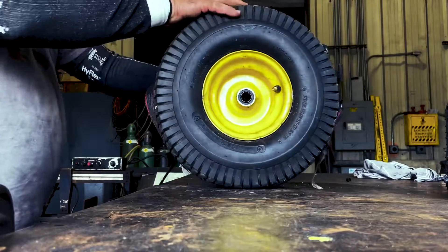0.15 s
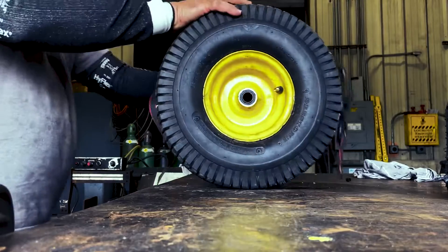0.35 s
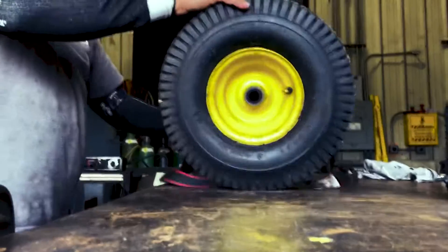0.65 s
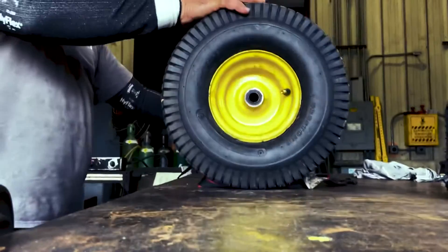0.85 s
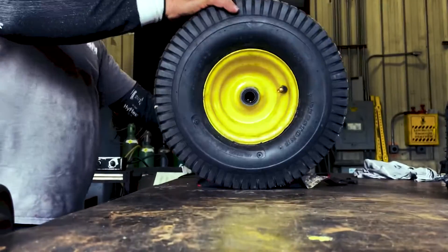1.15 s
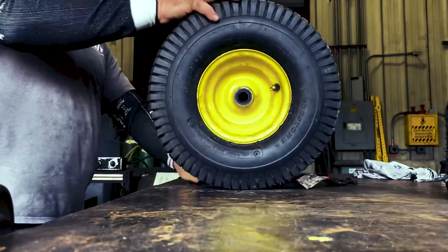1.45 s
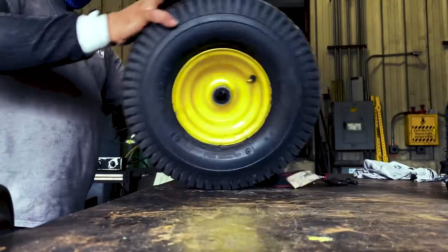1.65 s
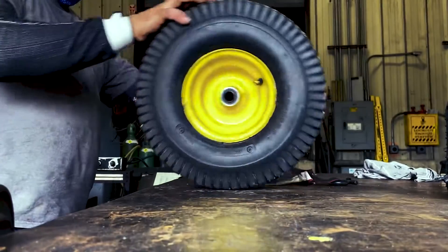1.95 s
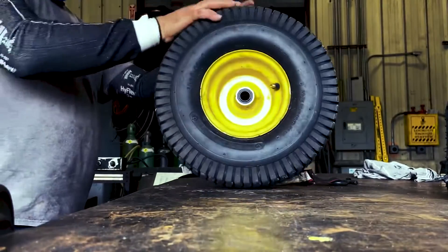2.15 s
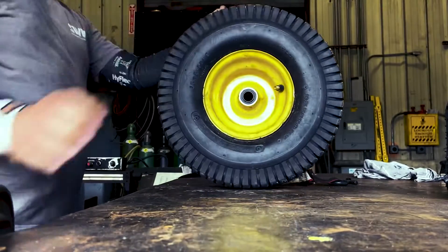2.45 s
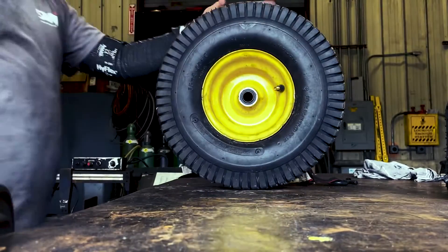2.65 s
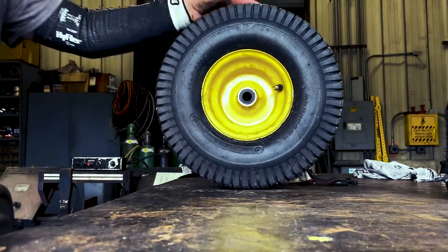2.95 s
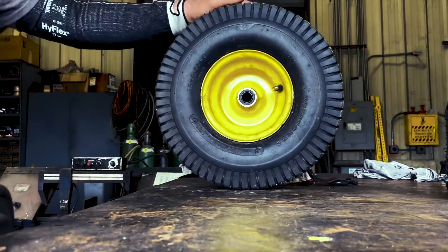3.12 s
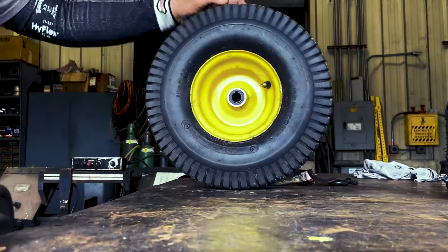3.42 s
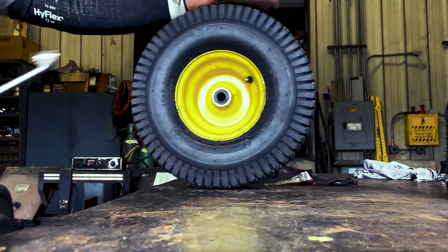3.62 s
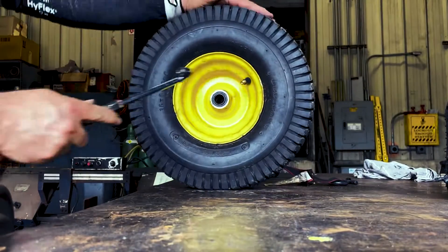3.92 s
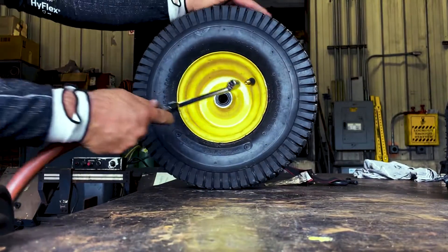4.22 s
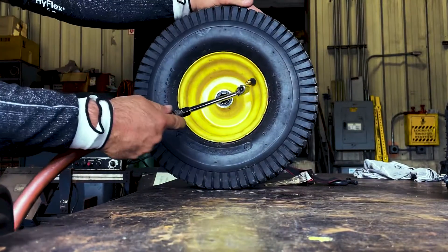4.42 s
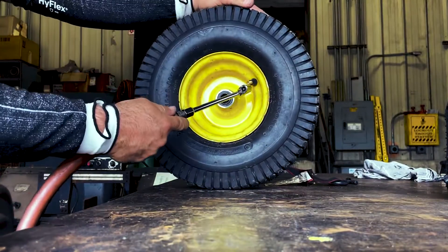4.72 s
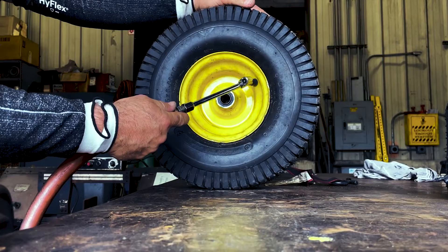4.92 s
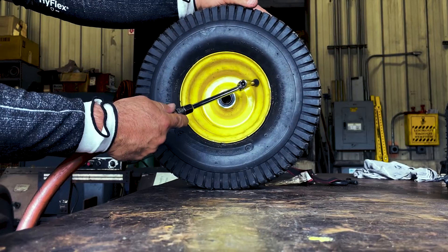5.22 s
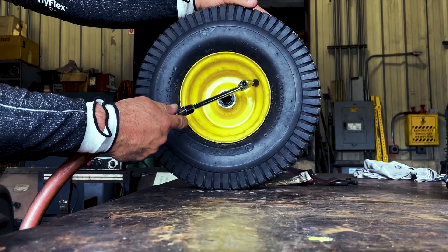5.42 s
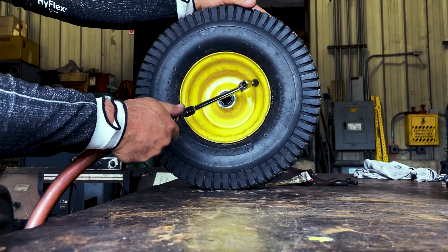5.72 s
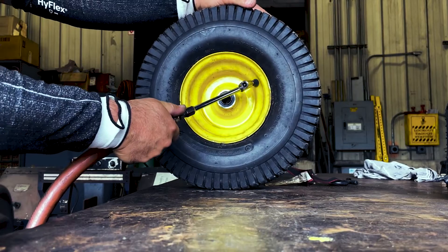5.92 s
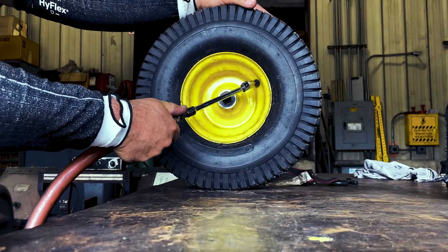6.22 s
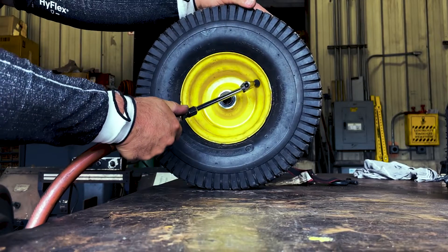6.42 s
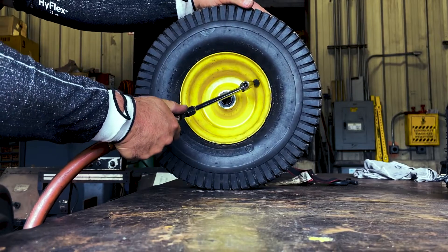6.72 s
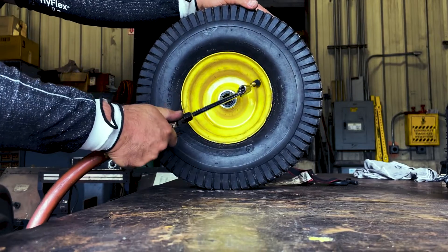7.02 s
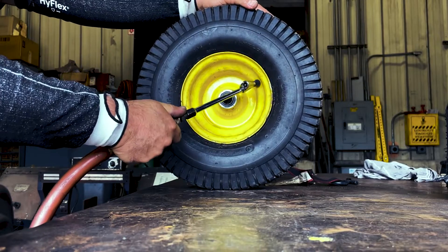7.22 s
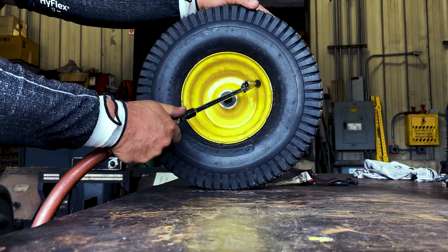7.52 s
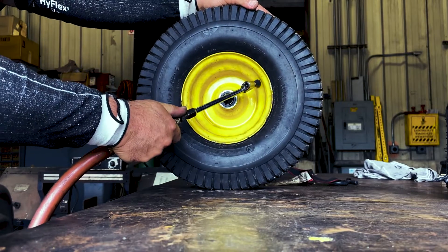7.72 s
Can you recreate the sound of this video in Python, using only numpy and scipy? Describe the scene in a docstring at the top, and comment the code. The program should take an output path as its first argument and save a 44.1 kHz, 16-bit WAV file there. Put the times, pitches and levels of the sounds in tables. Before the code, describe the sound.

A wide, breathy air leak fills the first seconds of a stereo close workshop recording, interrupted early by a strap buckle rattling and ringing on a booming metal bench. A low hum swells faintly. The hose drags, then loud pressure thumps and sharp crackling snaps hit the microphone as the chuck moves in. Afterwards a quieter, bright hiss flutters at the tire valve, weakening before a last small pop.

```python
"""In a workshop an air chuck leaks at some distance, a filtered hiss louder on the left in its low middle.
A strap buckle drops on the steel bench: decaying tones, bench booms and noise bursts, with the walls after.
At 3 s the hose scrapes, the chuck is lifted and its jet crosses the microphone: pressure pops, noise gusts.
From 4.1 s it is pressed on a small tire's valve close by, a fluttering hiss with a short breathy whistle.
A wavering sine hum comes and goes behind; a low noise rumble falls away after 4.1 s to a faint murmur."""
import sys
import numpy as np
from scipy import signal
from scipy.fft import rfft, irfft, next_fast_len
from scipy.io import wavfile
from scipy.ndimage import uniform_filter1d, map_coordinates

SR = 44100
rng = np.random.default_rng(int(sys.argv[2]) if len(sys.argv) > 2 else 0)


def store_wav(level_fs):
    """Save 16-bit WAV to argv[1]."""
    pcm = np.round(np.clip(np.atleast_2d(level_fs), -1, 1) * 32767)
    wavfile.write(sys.argv[1], SR, pcm.T.astype(np.int16))


N = 346626

# Leak across the shop, then swung closer: time_s, fizz_db, rumble_db
FAR_LEAK = [(0, -39, -49), (.45, -37.5, -45.5), (1.05, -38, -44), (1.5, -37.5, -48), (2.7, -36.5, -47.5),
            (3.09, -38, -46), (3.16, -32, -44), (3.24, -35, -42), (3.34, -36, -42), (3.48, -30, -36.5),
            (3.55, -33, -33.5), (3.64, -32.5, -51), (3.86, -33.5, -52), (4.01, -31.5, -37),
            (4.09, -31.5, -53), (4.14, -39, -62)]
# Its spectrum: pitch_hz, density_db (per Hz)
FAR_COLOUR = [(60, -5), (130, 0.0), (300, -7.8), (700, -6.2), (1600, -7.3), (2200, -11.3), (3000, -11.5),
              (4400, -5.2), (5300, -8.4), (7800, -7.0), (9600, -0.6), (11700, -4.0), (13500, -6.7),
              (15600, -3.2)]
# Its likeness between left and right: pitch_hz, correlation (1 is identical)
FAR_ALIKE = [(60, 0.98), (300, 0.93), (700, 0.14), (1400, 0.014), (2200, 0.077), (3100, 0.85), (4200, 1),
             (5200, 0.5), (6200, 0.29), (7300, 0.47)]
# Its lean: pitch_hz, left_minus_right_db
FAR_BALANCE = [(200, -1), (700, 2), (1300, 5), (2400, 2.5), (4400, 1), (7000, 0)]
# Breathy resonances and dips of the chuck: pitch_hz, spread_hz, gain_db
FAR_PEAKS = [(503, 28, 4.5), (650, 67, 2), (827, 50, -4.5), (1280, 90, 1.5), (1510, 90, -2.5),
             (1770, 25, 2.5), (2150, 120, 0), (2530, 100, 5), (2900, 90, 1), (3304, 94, 6), (3900, 90, -1),
             (4230, 60, 2), (4590, 70, 4.5), (4860, 80, -3.5)]
# Throat, body, fizz and edge registers: rest_db, slope (dB gained for each dB of fizz)
FAR_FOLLOW = [(-47.5, 1.03), (-42, 1), (-36, 1.12), (-37.5, 3)]
FAR_REST_DB = -37  # fizz while the chuck lies still
BODY_FROM_RUMBLE, RUMBLE_REST_DB = 0.27, -42.5  # body dB for each dB of rumble over its rest
LIFTED_S, LIFTING_S = 3.08, .1  # once the chuck is lifted its resonances blur: start, length

# Leak at the valve as the grip shifts: time_s, hiss_db, throat_db
NEAR_LEAK = [(4.09, -39, -50), (4.18, -36.5, -47.5), (4.35, -40, -44.5), (4.55, -39, -41.5),
             (4.75, -40, -42), (4.92, -39.5, -43), (5.07, -39, -47.5), (5.17, -38, -42), (5.25, -37, -42.5),
             (5.35, -40, -49.5), (5.47, -38, -46.5), (5.53, -43.5, -48), (5.84, -43, -48.5),
             (5.93, -38, -45), (5.96, -42.5, -53), (6.095, -40, -49), (6.115, -39.5, -41),
             (6.17, -39.5, -43), (6.25, -44.5, -49), (6.4, -41, -47.5), (6.7, -40, -49), (6.84, -41, -46.5),
             (6.905, -39, -48.5), (6.93, -45.5, -62), (7.03, -45.5, -61), (7.13, -49, -59),
             (7.26, -45, -62), (7.36, -48, -63.5), (7.65, -45.5, -58), (7.8, -39.5, -45.5),
             (7.86, -38, -45)]
# Its middle register: time_s, level_db
NEAR_MIDDLE = [(4.18, -48), (4.22, -47), (4.33, -50), (5.19, -50.5), (5.2, -49.5), (5.66, -53.5),
               (5.9, -50.5), (6.0, -55.5), (6.15, -45.5), (6.21, -52), (6.61, -48), (6.91, -49.5),
               (6.93, -63.5), (7.64, -59.5), (7.85, -48.5), (7.86, -52)]
# Its spectrum: pitch_hz, density_db (per Hz)
NEAR_COLOUR = [(650, -27), (830, -14), (1300, -9.5), (1600, -8), (2120, -10.5), (2450, -16.5),
               (2800, -15.5), (3300, -15.5), (4400, -13.1), (7000, -14.2), (9300, -12.5), (11500, -7.1),
               (13300, -8.8), (14600, -3.8), (15600, 0.0)]
# Its likeness between left and right: pitch_hz, correlation
NEAR_ALIKE = [(300, 0.93), (640, 0.54), (1400, 0.87), (2100, 0.95), (2800, 0.83), (3700, 1), (4300, 0.99),
              (4800, 0.69), (5400, 0.88), (6400, 0.62), (7300, 0.67)]
# Treble likeness given to both hisses: pitch_hz, correlation
TREBLE_ALIKE = [(7650, 1), (8700, 1), (9100, .8), (10100, .8), (10700, 1), (12200, 1), (12600, .8),
                (13800, .8), (14300, 1)]
# Body, fizz and edge registers: mean_db, slope (dB gained for each dB of hiss)
NEAR_FOLLOW = [(-44, 1.21), (-38, 1.3), (-25, 1.2)]
# Resonances and dips of the valve while air flows in: pitch_hz, spread_hz, gain_db
FILLING_PEAKS = [(1630, 28, 4), (1740, 85, -3.5), (2310, 91, -2.5), (3580, 80, 1.5), (3920, 40, 3.5)]
# The same once the flow drops: pitch_hz, spread_hz, gain_db
EASED_PEAKS = [(1900, 150, -4), (2550, 140, -6), (3030, 79, 5), (3530, 120, 3), (4550, 74, 5),
               (5540, 700, -2), (7000, 250, 3)]
NEAR_MEAN_DB, EASED_S = -39, 6.92  # mean hiss; moment the flow drops
EDGE_FLICKER_DB, FLICKERS_PER_S = 1.6, 12
# Breathy resonance of the valve stem: time_s, level_db
WHISTLE = [(4.3, -56), (4.4, -45), (4.6, -59), (4.8, -55), (5, -51), (5.16, -45), (5.3, -60)]
# Its spectrum: pitch_hz, density_db (per Hz)
WHISTLE_COLOUR = [(1150, -34), (1400, -1), (1570, 2), (1750, -21), (2100, -32), (4000, -90)]

# Strongest eddies of the jet on the microphone: time_s, level_db, width_ms, way (push 1, pull -1)
POPS = [(3.5149, -17, 1.4, 1), (3.5246, -13.1, 3, -1), (3.5363, -17, 1.7, 1), (3.5537, -15, 1.6, -1),
        (3.5672, -9, 1.6, 1), (3.5739, -14, 1.6, -1), (3.5807, -9.5, 1.9, -1), (3.5846, -5.5, 3.1, 1),
        (3.592, -4.5, 1.8, -1), (3.5953, -2, 2.4, 1), (3.5961, -3.5, 1.6, -1), (3.6109, -15.5, 1.5, 1),
        (3.6158, -21.5, 1.4, -1), (3.7424, -33, 0.9, -1), (3.908, -20, 1.4, -1), (3.9545, -14, 1.2, 1),
        (3.9725, -20.5, 0.89, -1), (3.985, -18, 0.45, -1), (3.9898, -7.5, 0.41, 1), (3.9972, -11, 0.35, 1),
        (4.0025, -10, 0.25, 1), (4.0106, -23, 0.34, -1), (4.0283, -13.5, 0.28, -1), (4.0325, -15, 0.12, 1),
        (4.039, -14, 0.19, -1), (4.0515, -16.5, 0.2, 1), (4.0635, -20.5, 0.25, 1),
        (4.0745, -25.5, 0.15, -1), (4.1004, -25, 1, -1), (4.1178, -25, 1.6, 1), (4.1483, -33, 0.92, 1),
        (4.1591, -29, 0.64, -1), (4.1745, -30, 0.74, -1), (4.1966, -25, 0.83, 1), (4.2027, -22.5, 1.05, -1),
        (4.2131, -25.5, 0.85, 1), (4.2214, -23.5, 0.86, 1), (4.2257, -24.5, 1.1, -1),
        (4.2364, -34, 0.77, 1), (4.2546, -25, 0.57, -1), (4.2677, -26, 1.7, -1), (4.292, -21, 0.33, -1),
        (4.3642, -43, 0.85, 1), (4.4425, -33, 0.24, 1), (4.6638, -34.5, 0.33, -1), (4.6943, -30, 0.35, 1),
        (4.7098, -20, 0.21, -1), (4.7201, -32, 0.81, -1), (5.1258, -31.5, 0.58, 1), (5.1792, -32, 0.36, -1),
        (5.1974, -31.5, 0.69, -1), (5.2257, -31, 0.35, -1), (5.2316, -29, 0.33, 1), (5.2454, -27, 0.71, -1),
        (5.2634, -38.5, 1.1, -1), (5.3081, -34.5, 0.3, 1), (5.3732, -39.5, 0.64, 1),
        (5.4685, -41, 0.49, -1), (5.5539, -41, 0.87, 1), (6.0141, -43, 0.78, 1), (6.106, -39.5, 0.21, 1),
        (6.1675, -44.4, 0.51, 1), (7.8154, -34.5, 0.57, -1), (7.8357, -19.5, 0.52, 1),
        (7.8517, -26, 0.5, -1)]
# Small eddies at random: start_s, end_s, level_db, eddies_per_s (nominal), width_ms
FLURRIES = [(3.4, 3.6, -31.5, 118, 1.1), (4.076, 4.3, -46.5, 63, 0.39), (4.331, 5.1, -47.5, 11.6, 1.6),
            (5.2, 5.27, -38.5, 65, 0.45), (5.299, 6.2, -53.5, 6.1, 1.3)]
SIDEWAYS_DB, SCATTER_DB = 1.2, -3.5  # scatter of left against right; size scatter of the small eddies
SNAP_DB, SNAP_LATE_S, SNAP_WIDTH_S = -6, .0015, .00007  # a thin snap after each tip
# Bursts of rushing air: time_s, level_db, rise_s (for 20 dB), t60_s, brightness_db
GUSTS = [(3.135, -31.5, 0.021, 0.18, 3), (3.2, -45, 0.032, 0.86, 4), (3.45, -46.5, .3, 0.93, 6),
         (3.521, -36, 0.064, 0.2, 8), (3.585, -29.5, 0.035, 0.13, 1.5), (3.978, -28, 0.026, .2, -3),
         (3.993, -18.5, 0.008, 0.27, -7), (4.033, -18, 0.082, 0.14, -1.5), (4.065, -35.5, .01, 0.26, 4),
         (4.221, -36.5, 0.021, 0.38, 0), (5.24, -42, 0.037, 0.09, 0.5), (6.105, -57, .004, 0.13, 13)]
# Their spectrum: pitch_hz, density_db (per Hz)
GUST_COLOUR = [(60, -8), (150, -29), (300, -15.5), (600, -13), (1000, -10), (1500, -13), (3000, -4),
               (5000, -11.5), (7000, -13.5), (12000, -36), (15500, -24)]
GUST_LUMPS_DB = 2.8

# Bounces, each level relative to its own layer:
# time_s, level_db, bench_db, edge_db, clank_hz, clank_db, clatter_db
BUCKLE = [(0.5663, -1, -9, -16, 3460, 0, -1), (0.588, -13, -10.5, -22, 2700, 2, -2.5),
          (0.62, -17.5, -18, -30, 2600, 5, -11), (0.6702, -6.5, -8.5, -37, 2450, 5, -2),
          (0.7438, -16.5, -28, -30, 2790, 3.5, 0), (0.7783, -11, -8, -8.5, 2660, 9, -5),
          (0.79, -17.5, -17, -9, 2900, 8, -4.5)]
# Tones of the bench top: pitch_hz, level_db, t60_s
BENCH = [(108, -12.5, 1), (198.4, -8.5, 0.53), (243.4, -6, 0.52), (300.6, 0.5, 0.75), (368, -1, 0.27),
         (438, -6.5, 0.54), (482, -8.5, 1), (538, -1, 0.27), (613, -13, 0.33), (665, -18, 0.32),
         (759, -14, 0.35), (971, -6.5, 0.13), (1060, -20.5, 0.26), (1230, -21, 0.26)]
# Tones of the steel buckle: pitch_hz, width_hz (wider dies sooner), level_db
STEEL = [(1748, 31, -0.5), (1960, 39, -5), (2120, 40, -17), (2428, 34, 6), (2538, 26, 3), (2720, 21, -7.5),
         (2930, 25, 2.5), (3220, 37, 3), (3760, 48, -7), (3590, 56, -8), (4000, 62, -23), (4540, 60, -5),
         (4950, 43, -26), (5200, 39, -15.5)]
# Clatter spectrum: pitch_hz, density_db (per Hz)
CLATTER = [(150, -28), (350, 0.5), (800, -13), (1300, -2.5), (1900, -9.5), (2600, -4.5), (3700, -7.5),
           (5500, -32.5), (8500, -48), (11000, -57)]
# Clatter decay: pitch_hz, t60_s
CLATTER_T60 = [(400, 0.67), (1200, 0.45), (2600, 0.48), (4000, 0.31), (7000, 0.25)]
# Decay of the sound between the walls: pitch_hz, t60_s
WALLS = [(200, 0.63), (1000, 0.39), (3000, 0.2), (7000, 0.099)]
RING_DB, BOOM_DB, BOOM_RISE_S, BUCKLE_LEFT_DB = -23.5, -11.5, 0.0044, 0.3
RING_WANDER, BOOM_WANDER = .02, .009  # random phase steps that roughen the tones, radians a sample
CLANK_T60_S, TICK_T60_S, TICK_DB = 0.14, 0.058, -10.5  # the tick is the crack of contact

# Hose dragging over the bench as the chuck is lifted: time_s, level_db
DRAG = [(3.1, -49), (3.116, -50), (3.134, -29.5), (3.2, -44.5), (3.324, -39), (3.368, -47.5),
        (3.418, -37.5), (3.458, -40.5), (3.53, -30.5)]
# Its spectrum: pitch_hz, density_db (per Hz)
DRAG_COLOUR = [(150, -30), (300, 0), (420, 0), (600, -3), (760, -16.5), (1500, -49.5)]
# Low rumble that falls away after 4.1 s, then a faint murmur: time_s, level_db
SHOP = [(4.08, -42), (4.16, -58), (4.33, -65), (5.4, -71.5), (6.54, -59), (7.24, -66.5), (7.64, -57.5),
        (7.86, -56)]
# Its spectrum: pitch_hz, density_db (per Hz)
SHOP_COLOUR = [(25, -5.5), (60, -5), (130, 4), (300, -3.5), (600, -10), (900, -43.5)]
# Swells of the hum: start_s (of the hold), hold_s, level_db
HUM = [(.75, .2, -53), (1.97, .05, -51), (2.62, 1, -47.5), (6.3, 0.38, -65), (7.6, .3, -58)]
HUM_HZ, HUM_WAVER_HZ = 58.4, 2.9
HUM_RISE_DB_PER_S, HUM_FALL_DB_PER_S, HUM_REST_DB = 57, 64.5, -70

# Treble phase between the channels: pitch_hz, left_lag_radians
TURN = [(5800, 0), (6370, .6), (6890, 1.3), (7410, 2.2), (7680, 3.12), (8750, 3.16), (10700, 6.2),
        (12300, 6.4), (14300, 9.4), (15250, 9.45), (15600, 10.0)]
TOP_HZ = 15900  # band limit of the recorder
HALVES = np.array([[.5], [-.5]])  # splits a left-minus-right difference over the two channels


def near_leak():
    """Air squeezes past the valve seat and flutters as the hand shifts; its topmost edge flickers."""
    hiss_db, throat_db = curves(NEAR_LEAK)
    body_db, fizz_db, edge_db = follow(hiss_db - NEAR_MEAN_DB, NEAR_FOLLOW)
    edge_db = edge_db + EDGE_FLICKER_DB * wobble(FLICKERS_PER_S)
    rows = np.transpose([np.arange(N) / SR, throat_db, *curves(NEAR_MIDDLE), body_db, fizz_db, edge_db])
    colour, alike = [(350, -29.5)] + NEAR_COLOUR, NEAR_ALIKE + TREBLE_ALIKE
    centres_hz = [1500, 2900, 4800, 11500, 15000]
    filling = rush(colour, alike, .7, centres_hz, rows, peaks=FILLING_PEAKS)
    eased = rush(colour, alike, .7, centres_hz, rows, peaks=EASED_PEAKS)
    hiss = np.where(np.arange(N) < EASED_S * SR, filling, eased)
    whistle_rows = [(4.2, -90)] + WHISTLE + [(5.4, -100)]
    whistle = rush([(500, -90)] + WHISTLE_COLOUR, NEAR_ALIKE, .7, [1570], whistle_rows)
    return (hiss + whistle) * amp(0.76 * wobble(45)) * fade(4.09, 0.015)


def far_leak():
    """Air escapes from the chuck some way off; lifting it crossfades its resonances into plain hiss."""
    s, fizz_db, rumble_db = np.transpose(FAR_LEAK)
    throat_db, body_db, *top_db = follow(fizz_db - FAR_REST_DB, FAR_FOLLOW)
    body_db = body_db + BODY_FROM_RUMBLE * (rumble_db - RUMBLE_REST_DB)
    rows = np.transpose([s, rumble_db, throat_db, body_db, *top_db])
    colour, alike = [(8.7, -37.0)] + FAR_COLOUR, FAR_ALIKE + TREBLE_ALIKE
    centres_hz = [250, 1500, 4500, 10500, 15000]
    lying = rush(colour, alike, 1.55, centres_hz, rows, FAR_BALANCE, size=1024, peaks=FAR_PEAKS)
    lifted = rush(colour, alike, 1.55, centres_hz, rows, FAR_BALANCE, size=1024)
    angle = np.pi / 2 * fade(LIFTED_S, LIFTING_S)
    hiss = np.cos(angle) * lying + np.sin(angle) * lifted
    return hiss * amp(0.45 * wobble(30.07)) * (1 - fade(4.1, 0.056))


def pops():
    """Each eddy pushes or pulls the microphone's pressure: a sharp tip on a broad foot, then a snap."""
    out, t = np.zeros((2, N + 2000)), np.arange(-800, 800) / SR
    eddies = POPS + flurries()
    leans = rng.standard_normal(len(eddies))
    for (s, db, width_ms, way), lean in zip(eddies, leans):
        age = 1000 * np.abs(t) / max(width_ms, .05)
        push = 0.74 * np.exp(-age) + 1.35 * np.exp(-5 * age) + 0.041 * np.exp(-.3 * age)
        push = push + amp(SNAP_DB) * np.exp(-np.abs(t - SNAP_LATE_S) / SNAP_WIDTH_S)
        first = round(s * SR) - len(t) // 2
        gain = np.sign(way) * amp(db + SIDEWAYS_DB * lean * HALVES)
        out[:, first:first + len(t)] += gain * push
    return out[:, :N]


def flurries():
    """Turbulence sheds small eddies, unevenly spaced through each flurry."""
    rows = []
    for start, end, db, rate, width_ms in FLURRIES:
        draw = rng.standard_normal((40, 3))
        times = start + np.cumsum(np.exp(.5 * draw[:, 0])) / rate
        for s, (_, size, way) in zip(times, draw):
            if s < end:
                rows.append((s, db + SCATTER_DB * size, width_ms, way))
    return rows


def gusts():
    """The jet crosses the microphone: lumpy noise that swells and dies."""
    t = np.arange(0, N / SR, .003)
    swells = []
    for s, db, rise, t60, _ in GUSTS:
        swells.append(db + np.where(t < s, 20 * (t - s) / rise, -60 * (t - s) / t60))
    loudest = np.argmax(swells, axis=0)  # the strongest gust sets level and brightness
    level_db = np.maximum(np.max(swells, axis=0), -120)
    rows = np.transpose([t, level_db, level_db + 0.5 + np.array(GUSTS)[loudest, -1]])
    alike = [(300, 0.76), (1000, 0.73), (3000, 0.85), (7200, 1.0)]
    lean = [(300, 2.5), (2000, 5.0), (5000, 4.0), (8000, 5.5)]
    air = rush([(20, -17)] + GUST_COLOUR, alike, 0.3, [700, 3000], rows, lean, size=256)
    return air * unit(amp(GUST_LUMPS_DB * wobble(300)))


def buckle():
    """Every bounce clatters, rings the buckle and booms in the bench top; the walls answer each anew."""
    out, count = np.zeros((2, N)), SR // 2
    for s, db, bench_db, edge_db, clank_hz, clank_db, clatter_db in BUCKLE:
        hit = amp(RING_DB) * steel_ring(count) + amp(bench_db + BOOM_DB) * bench_boom(s, count)
        clatter = amp(15.0 + clatter_db) * dying(CLATTER, CLATTER_T60)
        edge = amp(edge_db + 19.0) * dying([(3000, -30), (5000, 0), (8500, -14), (11000, -60)], CLATTER_T60)
        middle, side = clatter + amp(clank_db + 10.5) * clank(clank_hz) + edge
        walls = dying([(200, -29.0), (900, 10), (6000, -0.5), (9000, -31.5)], WALLS)
        room = signal.fftconvolve(hit[None], walls, axes=1)[:, :count]
        bounce = hit + amp(-2.5) * room + middle + 0.44 * side * [[1], [-1]]
        start = round(s * SR)
        out[:, start:start + count] += amp(db + BUCKLE_LEFT_DB * HALVES) * bounce
    return out


def steel_ring(count):
    """The struck buckle rings in roughened tones, the wider ones dying sooner."""
    t, ring = np.arange(count) / SR, 0
    for hz, width, level_db in STEEL:
        fall = amp(level_db + rng.normal(0, 2) - 16 * width * t)
        phase = 2 * np.pi * hz * t + rng.uniform(0, 6) + wander(RING_WANDER, count)
        ring = ring + fall * np.sin(phase)
    return ring


def bench_boom(s, count):
    """The bench top booms in low tones that build up briefly and die within half a second."""
    t, boom = np.arange(count) / SR, 0
    for hz, level_db, t60 in BENCH:
        fall = amp(level_db + rng.normal(0, 1.5) - 60 * t / t60)
        # phase runs from the start of the scene, so the bounces' tones roughly line up
        phase = 2 * np.pi * hz * (s + t) + wander(BOOM_WANDER, count)
        boom = boom + fall * np.sin(phase)
    return boom * np.cos(np.pi * t) * (1 - np.exp(-t / BOOM_RISE_S))


def clank(hz):
    """The face that lands sets the pitch of a noise band; a shorter tick cracks with it."""
    band = [(.7 * hz, -24), (.88 * hz, -3), (1.1 * hz, 0), (1.6 * hz, -18), (3 * hz, -70)]
    tick = dying([(1500, -30), (2500, 0), (4200, -3), (5200, -25), (9000, -60)], [(1, TICK_T60_S)])
    return dying(band, [(1, CLANK_T60_S)]) + amp(TICK_DB) * tick


def drag():
    """The hose rubs over the bench: a rough low scrape of noise."""
    rows = [(3.08, -90)] + DRAG + [(3.6, -89.5)]
    return rush(DRAG_COLOUR, [(300, .9)], 1.3, [450], rows, [(300, 1.5)]) * amp(1.4 * wobble(70))


def shop():
    """A wavering hum swells, holds and fades; low noise enters at 3.8 s and sinks to a faint murmur."""
    t = np.arange(N) / SR
    swells = []
    for s, hold, db in HUM:
        before, after = np.maximum(s - t, 0), np.maximum(t - s - hold, 0)
        swells.append(db - HUM_RISE_DB_PER_S * before - HUM_FALL_DB_PER_S * after)
    hum_db = np.maximum(np.max(swells, axis=0), HUM_REST_DB)
    phase = 2 * np.pi * np.cumsum(HUM_HZ + HUM_WAVER_HZ * wobble(4.0)) / SR
    hum = np.sin(phase) * np.sqrt(2)  # rms 1
    low_noise = rush(SHOP_COLOUR, [(100, 1.0), (600, 1.0)], 2.6, [200], SHOP, size=2048)
    return low_noise * fade(3.8, 0.17) + amp(hum_db) * hum


def rush(colour, alike, patchy_db, centres_hz, rows, lean=((1, 0),), size=512, peaks=()):
    """Patchy stereo noise; overlapping registers around centres_hz follow the dB columns of rows."""
    hz, t, z = signal.stft(rng.standard_normal((2, N)), SR, nperseg=size)
    patches = uniform_filter1d(rng.standard_normal(z.shape[1:]), size=10, axis=0)
    patches = uniform_filter1d(patches, size=6, axis=1)
    bumps_db = sum(db * np.exp(-.5 * ((hz - c) / w) ** 2) for c, w, db in peaks)
    spectrum = amp(along(colour, hz) + bumps_db)
    s, *levels_db = np.transpose(rows)
    registers = 0
    for weights, db in zip(np.eye(len(centres_hz)), levels_db):
        shape = spectrum * along(list(zip(centres_hz, weights)), hz)
        gain = amp(np.interp(t, s, db)) / np.sqrt(np.mean(shape ** 2))
        registers = registers + shape[:, None] * gain
    # mixing two noises at this angle gives the wanted correlation of left and right
    angle = np.arccos(np.clip(along(alike, hz), -1, 1))[:, None] / 2
    mid, side = np.cos(angle) * z[0], np.sin(angle) * z[1]
    pair = np.array([mid + side, mid - side]) * amp(along(lean, hz) * HALVES)[:, :, None]
    return signal.istft(pair * registers * amp(patchy_db * unit(patches)), nperseg=size)[1][:, :N]


def dying(colour, t60s):
    """Half a second of stereo noise whose frequencies die at their own speeds, left energy 1."""
    hz, t, z = signal.stft(rng.standard_normal((2, SR // 2)), SR, nperseg=128)
    level_db = along(colour, hz)[:, None] - 60 * t / along(t60s, hz)[:, None]
    tail = signal.istft(z * amp(level_db), SR, nperseg=128)[1][:, :SR // 2]
    return tail / np.linalg.norm(tail[0])


def follow(lead_db, laws):
    """Levels that rise and fall with a leading level."""
    return [base_db + slope * lead_db for base_db, slope in laws]


def wander(step, count):
    """A phase that drifts at random."""
    return np.cumsum(step * rng.standard_normal(count))


def wobble(rate):
    """A smooth random curve, rate knots a second."""
    knots = rng.standard_normal(int(N * rate / SR) + 4)
    return map_coordinates(knots, [np.arange(N) * rate / SR])


def fade(start, length):
    """Rises from 0 to 1 after start."""
    return np.clip((np.arange(N) / SR - start) / length, 0, 1)


def curves(rows):
    """One value per sample for each column after the time."""
    s, *cols = np.transpose(rows)
    return [np.interp(np.arange(N) / SR, s, c) for c in cols]


def along(points, hz):
    """(Hz, value) points joined on a log frequency axis."""
    f, v = np.transpose(points)
    return np.interp(np.log(hz + 1), np.log(f + 1), v)


def amp(db):
    """Gain of a level in dB."""
    return 10 ** (np.asarray(db) / 20)


def unit(x):
    """x at rms 1."""
    return x / np.sqrt(np.mean(x ** 2) + 1e-20)


def filtered(x, response):
    """x times a complex response of frequency."""
    m = next_fast_len(N + SR // 2)
    return irfft(rfft(x, m) * response(np.fft.rfftfreq(m, 1 / SR)), m)[..., :N]


def scene():
    """All sources together."""
    return near_leak() + far_leak() + pops() + gusts() + buckle() + drag() + shop()


def response(hz):
    """The recorder cuts and delays the bass and turns the treble phase between the channels."""
    lag = np.exp(-3.5j * np.pi * np.log((hz + 30) / 2000))
    cut = 1 / np.sqrt(1 + (48 / (hz + 1)) ** 7)
    turn = np.exp(-1j * along(TURN, hz) * HALVES)
    return lag * cut * turn


def record(dry):
    """The recorder colours the sound, rounds off the loudest peaks and ends at its band limit."""
    wet = filtered(dry, response)
    wet = wet / (1 + np.abs(wet / .9) ** 6) ** (1 / 6)
    return filtered(wet, lambda hz: hz < TOP_HZ)


dry = scene()
out = record(dry)
store_wav(out)
```